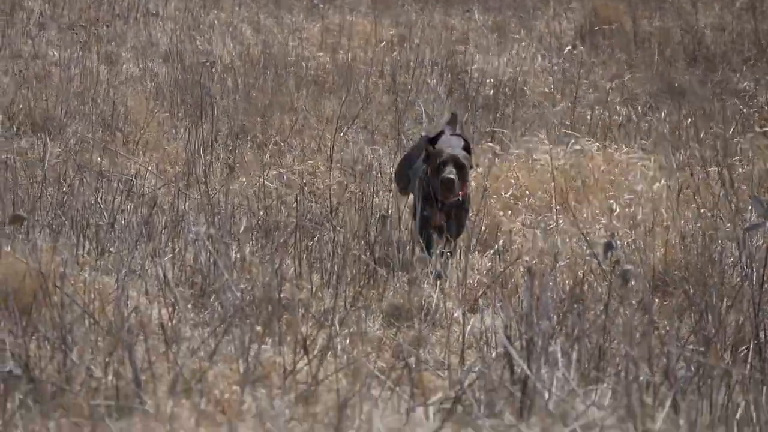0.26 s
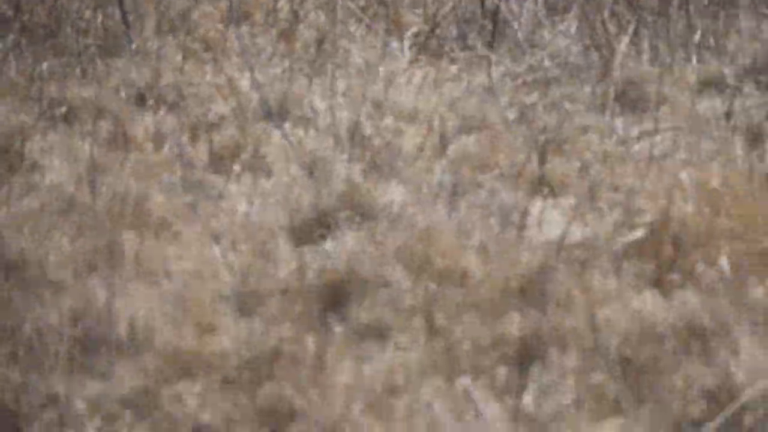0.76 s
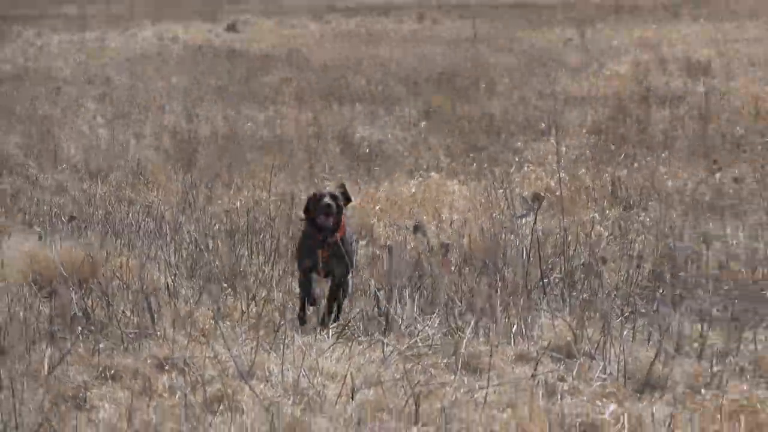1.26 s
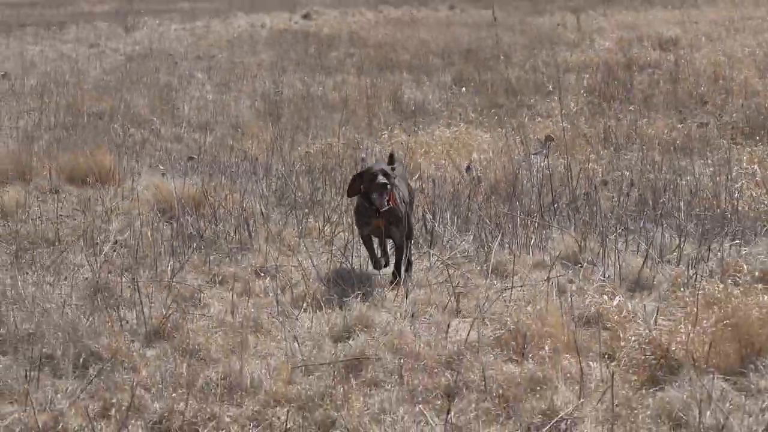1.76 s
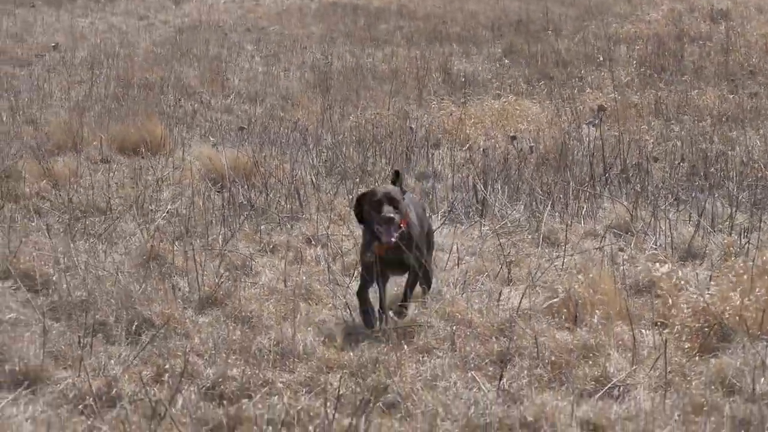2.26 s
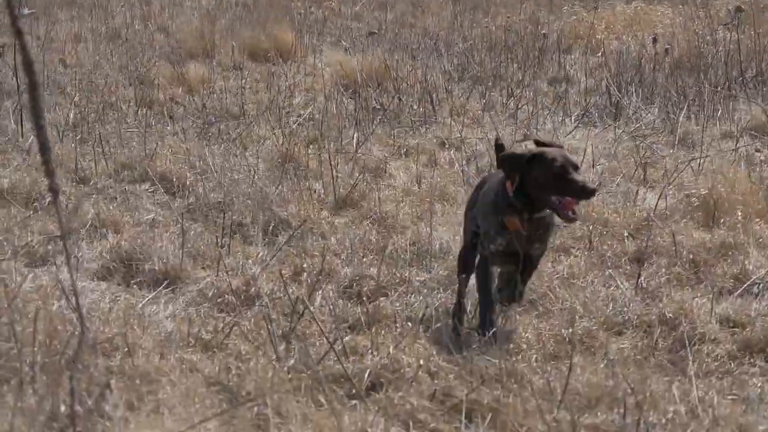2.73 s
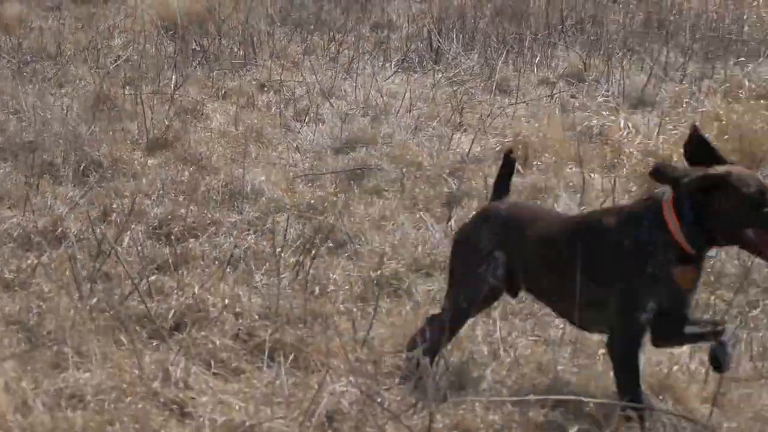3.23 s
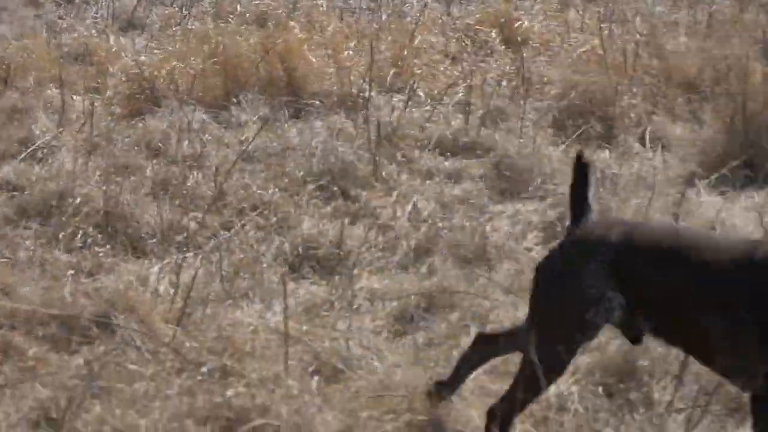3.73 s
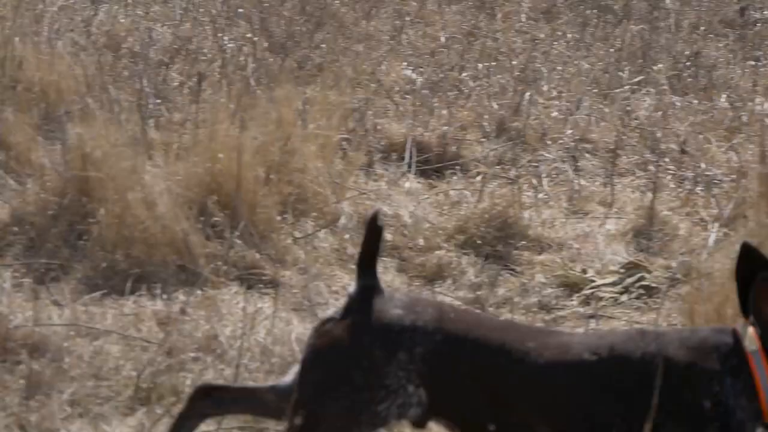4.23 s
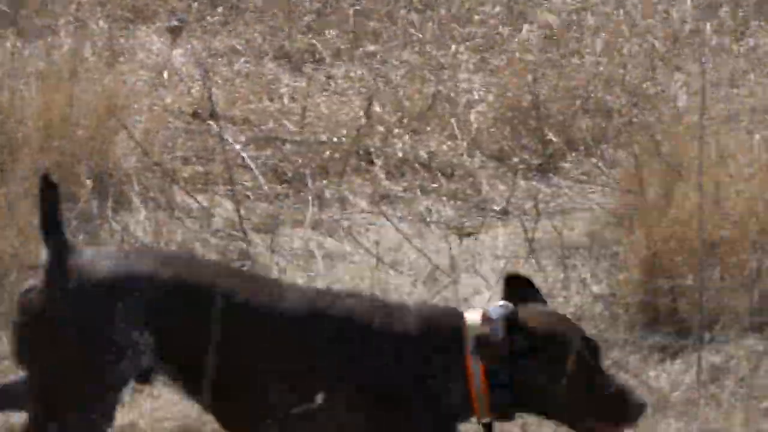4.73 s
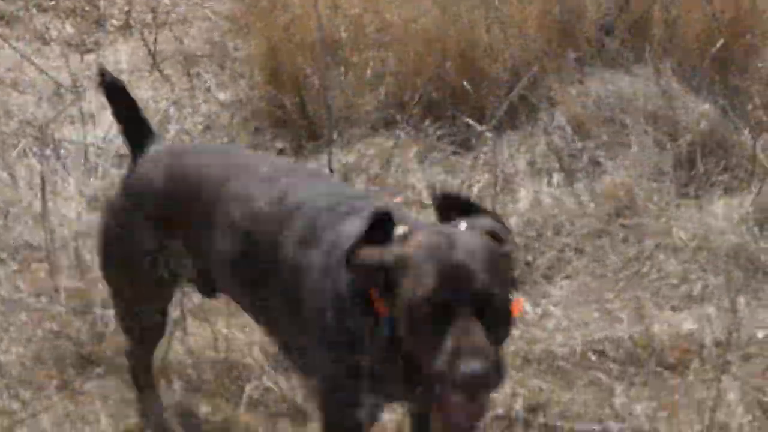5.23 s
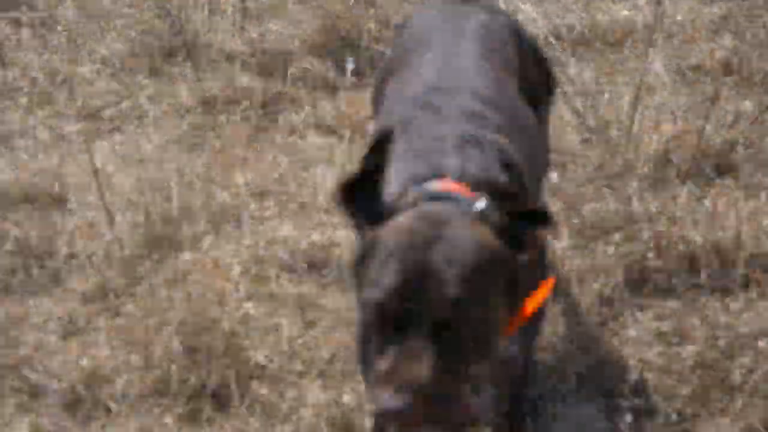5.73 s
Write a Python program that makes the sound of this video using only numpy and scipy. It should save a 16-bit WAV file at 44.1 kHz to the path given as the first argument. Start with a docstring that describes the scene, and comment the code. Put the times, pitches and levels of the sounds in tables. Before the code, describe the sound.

A small collar bell jingles in quick uneven rings as a dog gallops closer through dry grass, with strong wind rumbling over the microphone.

```python
"""Belled dog galloping through dry grass

A dog gallops towards the microphone and slows to a trot: modes of a small collar bell, struck unevenly on its
broad or narrow side, ring as decaying sines damped by the fur. Shaped noise makes the clapper's clicks,
the rustling and snapping stalks, the soft panting and the strong wind that buffets the microphone.
A faint lower sine rings from a collar fitting near the end."""
import sys
import numpy as np
from scipy.fft import rfft, irfft, next_fast_len
from scipy.io import wavfile
from scipy.ndimage import uniform_filter1d, map_coordinates

SR = 44100
rng = np.random.default_rng(int(sys.argv[2]) if len(sys.argv) > 2 else 0)


def transcribe(u):
    """Save the signal u as a 16-bit wav file named by the first command-line argument.

    u: samples, shape (n,) or (channels, n), limited to [-1, 1]; the rate is SR.
    q: integer samples, one column per channel.
    """
    v = np.clip(np.atleast_2d(u).T, -1, 1)
    q = np.round(v * 32767).astype(np.int16)
    wavfile.write(sys.argv[1], SR, q)


N = 264159
TIME = np.arange(N) / SR


def amp(db):
    """Decibels to gain."""
    return 10 ** (np.asarray(db) / 20)


def unit(x):
    """x at rms 1."""
    return x / np.sqrt(np.mean(x ** 2) + 1e-20)


def curves(rows):
    """Per-sample interpolation of each column after the time."""
    times, *columns = np.transpose(rows)
    return [np.interp(TIME, times, column) for column in columns]


def wobble(knots_per_s):
    """Smooth random curve through normally distributed knots."""
    knots = rng.standard_normal(int(N * knots_per_s / SR) + 4)
    return map_coordinates(knots, [TIME * knots_per_s])


def bump(offset, width):
    """Gaussian swell: 1 at offset 0, 1/e at one width."""
    return np.exp(-(offset / width) ** 2)


def filtered(x, response):
    """x times a gain that is a function of frequency."""
    size = next_fast_len(N + SR // 2)
    spectrum = rfft(x, size) * response(np.fft.rfftfreq(size, 1 / SR))
    return irfft(spectrum, size)[:N]


def coloured(x, points):
    """x shaped by (frequency [Hz], level [dB]) points on a log axis, at rms 1."""
    point_hz, db = np.transpose(points)
    return unit(filtered(x, lambda hz: amp(np.interp(np.log(hz + 1), np.log(point_hz + 1), db))))


def noise(points):
    """Noise of rms 1 with the given spectrum."""
    return coloured(rng.standard_normal(N), points)


def fade(age, t60):
    """Free decay of a vibration: -60 dB at age t60."""
    return np.exp(-np.log(1000) * age / t60)


def latest(times):
    """Per sample: row of the most recent event and its age [s], infinite before the first."""
    row = np.searchsorted(np.maximum.accumulate(times), TIME, side="right") - 1
    row = np.maximum(row, 0)
    age = np.where(TIME < times[row], np.inf, TIME - times[row])
    return row, age


def swinging(depth_db, drift_rad, knots_per_s):
    """Complex gain of a mode: level and phase waver as the bell swings on the collar."""
    level = amp(depth_db * np.tanh(wobble(knots_per_s)))
    return level * np.exp(1j * drift_rad * wobble(knots_per_s))


# Doppler shift of the running dog: (time [s], pitch ratio)
DOPPLER = [(0, 1.011), (1.5, 1.011), (2.7, 1.009), (3.5, 1.003), (4.1, .999), (4.8, .998), (5.3, 1),
           (6, 1.001)]


def partial(hz, envelope):
    """One bell mode: a Doppler-shifted sine under a complex envelope."""
    clock = np.cumsum(curves(DOPPLER)[0]) / SR
    smooth = np.convolve(envelope, np.ones(12) / 12, "same")  # softens steps at strikes
    return np.imag(smooth * np.exp(2j * np.pi * (hz * clock + rng.random())))


# Clapper strikes: (time [s], ring level [dB], hardness [dB/octave], side struck [-1 narrow .. 1 broad],
# hum level [dB], time until the fur has damped the hum by 60 dB [s])
STRIKES = [(0.0,-47,-9,0.13,-40,0.77), (0.107,-43.5,1,0.34,-29,0.08), (.126,-43.5,-8,-0.63,-45,.9),
           (0.193,-48.5,4,-0.087,-39,0.2), (.3,-61.5,-12,.6,-47,0.21), (0.439,-54.5,-1,0,-49,.23),
           (0.535,-44.5,-4,-0.63,-34.5,0.16), (.569,-51,-4,-.2,-27.5,0.063), (0.681,-43,-0.5,0,-50,1),
           (.95,-43,3,-0.033,-34.5,0.14), (1.017,-55,11,-.1,-40.5,0.19), (1.142,-39,1.5,-.3,-31.5,.2),
           (1.216,-50,0,-0.99,-41.5,.26), (1.386,-33.5,0.5,-0.51,-25.5,0.25),
           (1.461,-41.5,-3.5,-0.79,-31.5,0.27), (1.763,-36.5,3,-0.73,-35.5,0.17),
           (1.848,-55,0,-0.74,-35.5,0.019), (1.97,-46,-5,-0.27,-41.5,0.15), (2.158,-49,-1,-0.92,-43,0.34),
           (2.363,-48,24,0.29,-34,0.098), (2.455,-43.5,5,-0.3,-37,0.29), (2.49,-46,-5,-0.081,-41,0.47),
           (2.597,-38.5,-2.5,0.39,-28,0.29), (2.794,-41,1,-0.053,-37,0.21),
           (2.805,-44,16.5,-0.43,-45.5,0.39), (3.042,-51.5,-8,0.87,-46.5,0.22),
           (3.171,-42.5,-17,0.58,-40,0.15), (3.199,-31,6,-0.59,-33,0.065), (3.356,-51.5,-8,0.39,-39.5,.32),
           (3.46,-31.5,3.5,1,-27,0.2), (3.649,-36,7.5,0.29,-34.5,0.19), (3.778,-29,0.5,-0.87,-28,0.37),
           (3.823,-54,-2,0.03,-25,0.11), (3.946,-32,2,0.86,-29.5,.14), (4.093,-33,5,0.99,-32,0.29),
           (4.156,-24.5,5,-0.22,-22.5,0.032), (4.321,-44,-1,0.79,-48,0.26), (4.471,-34.5,7,0.32,-32,0.24),
           (4.595,-27,-3.5,-0.75,-23.5,0.78), (4.646,-33,9.5,-0.59,-29.5,0.19),
           (4.685,-32,11.5,0.42,-34,0.64), (4.812,-30,3.5,-0.54,-25.5,0.31), (5.071,-29,0.5,0.53,-30,1),
           (5.213,-28.5,-1,-0.44,-15.5,0.035), (5.222,-23.5,2.5,-0.32,-21,1),
           (5.346,-25.5,3.5,-0.2,-20,0.52), (5.586,-22.5,2,-0.56,-24.5,0.96),
           (5.715,-20,-0.5,-0.85,-18.5,0.43), (5.88,-24.5,-3.5,-0.13,-26,1)]
PIVOT_HZ = 6000


def struck_db(hz, side_db):
    """Mode level per strike: hardness tilts the spectrum about the pivot, and each mode favours a side."""
    _, ring, hardness, side, *_ = np.transpose(STRIKES)
    return ring + hardness * np.log2(hz / PIVOT_HZ) + side_db * side


# A node of the hum faces the microphone: (time [s])
NODES = [.052, 1.655, 2.735, 3.812, 4.7, 5.111, 5.19, 5.289, 5.508, 5.603, 5.769, 5.869]
HUM_HZ = 1846


def bell_hum(hum_db=0, sinking=1.51, swing_db=2, drift_rad=0.8, swing_knots_per_s=26,
             knock_db=2, knock_t60=0.094, turn_s=0.011, node_s=0.0029):
    """Lowest mode; damping grows after each strike as the bell sinks back into the fur."""
    times, *_, level, hum_s = np.transpose(STRIKES)
    row, age = latest(times)
    knock = knock_db * fade(age, knock_t60)
    hum = amp(level[row] + hum_db + knock) * fade(age ** sinking, hum_s[row] ** sinking)
    # each node: a dip and a half-cycle slip, direction alternating
    facing = np.ones(N)
    for k, s in enumerate(NODES):
        offset = TIME - s
        facing = facing * (node_s + (-1) ** k * 1j * offset) / np.hypot(offset, turn_s)
    return partial(HUM_HZ, hum * facing * swinging(swing_db, drift_rad, swing_knots_per_s))


# The bell turns the loud side of its second mode to the microphone: (time [s], swell [dB])
SWELLS = [(1.5, 11), (2.4, 24.5), (2.68, 13.5), (3.55, 10), (3.67, 12), (4.13, 6), (5.11, 11), (5.33, 15),
          (5.81, 3.5), (5.91, 8), (5.99, 5.5)]
SHIMMER_HZ = 4207


def bell_shimmer(shimmer_db=-17, side_db=5, hum_time_ratio=1.9, sinking=1.66, swell_s=0.046,
                 swing_db=4, drift_rad=1.0, swing_knots_per_s=24):
    """Second mode: fur damps it more slowly than the hum; it swells as the bell turns."""
    times, *_, hum_s = np.transpose(STRIKES)
    row, age = latest(times)
    swell = sum(db * bump(TIME - s, swell_s) for s, db in SWELLS)
    level = struck_db(SHIMMER_HZ, side_db)[row] + shimmer_db + swell
    decay = fade(age ** sinking, (hum_time_ratio * hum_s[row]) ** sinking)
    return partial(SHIMMER_HZ, amp(level) * decay * swinging(swing_db, drift_rad, swing_knots_per_s))


# Bright bell modes: (frequency [Hz])
BRIGHT_HZ = [2300, 3480, 3720, 5422, 5650, 6442, 7435, 8620, 9385, 9700, 10772, 11400, 12265, 13995, 14852]
# Same modes in order: (relative level [dB], t60 [s], gain from a strike on the broad side [dB])
BRIGHT = [(-26.5, 0.045, -14), (-16, 0.014, -10), (-12.5, 0.033, -6), (3.1, 0.21, 6.5), (0, 0.29, 3.5),
          (-8, 0.14, -18), (-14, 0.073, -6), (-2.5, .16, 5.5), (-12, .1, -3), (-16, 0.099, 9),
          (-22.5, 0.16, -4), (-18.5, 0.04, -7), (-13, 0.17, -7), (-14, 0.1, 1), (-24, 0.096, -6)]


def bell_ring(ring_db=-1, bite_db=3, bite_t60=0.039, scatter_db=4.5, twin_db=3.5,
              swing_db=2.0, drift_rad=0.6, swing_knots_per_s=35, fur_stretch=2.36):
    """Bright modes, set ringing anew by each strike and shortened by the fur."""
    strikes = np.array(STRIKES)
    count = len(strikes)
    row, age = latest(strikes[:, 0])
    bite = amp(bite_db * fade(age, bite_t60))  # brief boost at the strike
    fur = fade(age, fur_stretch * strikes[row, -1]) ** .5
    lean_db = twin_db * rng.uniform(-1.3, 1, count)  # neighbouring modes trade strength
    out = np.zeros(N)
    for k, (hz, (db, t60, side_db)) in enumerate(zip(BRIGHT_HZ, BRIGHT)):
        # finer mode pattern: more sensitive to where the clapper lands
        luck_db = scatter_db * hz / PIVOT_HZ * rng.uniform(-1.17, 1, count)
        luck_db = luck_db + (-1) ** k * lean_db
        phase = np.exp(2j * np.pi * rng.random(count))
        start = amp(struck_db(hz, side_db) + luck_db + db + ring_db) * phase
        envelope = start[row] * fade(age, t60) * bite * fur
        out += partial(hz, envelope * swinging(swing_db, drift_rad, swing_knots_per_s))
    return out


def clapper(crack_db=-16, crack_t60=0.062, clack_db=-12, clack_t60=.022, muffled_db=15, muffled_s=0.075):
    """Metal on metal: a short crack, and a lower clack boosted when the fur muffles the bell."""
    times, ring, *_, hum, hum_s = np.transpose(STRIKES)
    row, age = latest(times)
    crack = noise([(700, -44), (1600, -4), (2400, 0), (3500, 0), (8000, 32), (15000, 6)])
    clack = noise([(500, -30), (1400, -49), (2100, 26), (2800, -5), (3600, 10), (8000, -10), (15000, -24)])
    clack_level = (hum + ring) / 2 + clack_db + muffled_db * bump(hum_s, muffled_s)
    cracks = amp(ring[row] + crack_db) * fade(age, crack_t60) * crack
    clacks = amp(clack_level[row]) * fade(age, clack_t60) * clack
    return cracks + clacks


# Rustle: (time [s], relative level [dB])
GRASS = [(0.0, -55), (0.25, -57.5), (1.12, -52.5), (1.35, -52.5), (1.5, -63), (1.72, -59), (1.93, -53.5),
         (2.12, -63), (2.38, -62.5), (2.52, -56.5), (2.87, -53), (2.95, -55.5), (3.77, -47.5),
         (4.39, -49.5), (4.69, -48.5), (5.99, -46.5)]
# Stalk spectrum: (frequency [Hz], relative density [dB])
STALKS = [(400, 4), (900, 1), (2000, 1), (2800, 0), (4500, 2), (6500, 0), (8200, 4), (10200, -3.5),
          (13000, 0.5), (15500, -2)]
# Paws plunge into the grass: (time [s], extra rustle [dB])
FOOTFALLS = [(.1, 6), (.93, 2), (1.8, 5.5), (2.05, 7), (2.46, 8.5), (2.96, 5.5), (3.15, 3.5), (3.41, 1),
             (3.73, -1), (3.9, 1.5), (4.09, 7.5), (4.28, 4.5), (4.671, 9), (4.952, 4.5), (5.098, 7.5),
             (5.588, 8.5), (5.83, 7)]


def grass(rustle_db=2.0, crackle_db=-4, grains_per_s=500, surge_db=2.0, footfall_s=0.046):
    """Legs brush stalks: noise swish plus sparse random crackle, its level shifted at footfalls."""
    strides = sum(db * bump(TIME - s, footfall_s) for s, db in FOOTFALLS)
    rustle = amp(curves(GRASS)[0] + rustle_db + strides + surge_db * wobble(35))
    grains = rng.laplace(size=N) * (rng.random(N) < grains_per_s / SR)
    return rustle * (noise(STALKS) + amp(crackle_db) * coloured(grains, STALKS))


# Spectra of buffets, eddies and field hush: (frequency [Hz], relative density [dB])
BUFFET = [(4, -56), (9, -11), (13, 2), (22, 0.5), (34, -4.5), (50, -13), (70, -21), (100, -39), (200, -100)]
FLUTTER = [(45, -5.5), (70, 2), (100, -3), (160, -9.5), (250, -19.5), (400, -28.5), (700, -39),
           (1500, -42.5), (4000, -66.5)]
AIR = [(100, 9.5), (500, 11), (1000, 7), (2000, -0.5), (4000, -2), (9000, -26), (15000, -87)]
# Steady push of the wind: (time [s], relative level [dB])
BUFFET_LEVEL = [(0.0, -40), (0.28, -25), (0.42, -20.5), (0.7, -29.5), (1.55, -16.5), (1.75, -22.5),
                (2.03, -19), (3.89, -25.5), (4.09, -18.5), (5.24, -31.5), (5.76, -27), (5.99, -32.5)]
# Fast eddies: (time [s], relative level [dB])
FLUTTER_LEVEL = [(0.0, -30.5), (0.8, -37.5), (1.15, -33), (1.3, -25), (1.35, -25), (1.38, -20.5),
                 (1.47, -30), (1.77, -30.5), (1.88, -24), (2.08, -33), (2.12, -24.5), (2.25, -29.5),
                 (2.27, -32.5), (2.57, -26.5), (2.67, -31), (2.77, -27.5), (2.92, -41), (2.95, -27.5),
                 (3.72, -35), (3.97, -29.5), (4.61, -28.5), (4.9, -36.5), (5.09, -35.5), (5.36, -44),
                 (5.44, -29), (5.47, -34), (5.99, -42)]
# Single gusts: (centre time [s], half-width to 1/e [s], relative level [dB])
GUSTS = [(0.097, 0.21, -15.5), (1.42, 0.071, -12), (1.668, 0.034, -16.5), (1.918, 0.021, -7),
         (2.122, 0.085, -10), (2.736, 0.084, -13), (3.113, 0.1, -15), (3.602, 0.053, -12.5),
         (4.405, 0.071, -13.5), (4.735, 0.028, -7), (5.191, .06, -10.5)]


def wind(buffet_db=4, gust_db=1, flutter_db=-1, lump_db=2.5, air_db=-57):
    """Gusts push the microphone in slow buffets and faster eddies, over the hush of the field."""
    gusts = sum(amp(db + gust_db) * bump(TIME - s, width) for s, width, db in GUSTS)
    force = np.hypot(amp(curves(BUFFET_LEVEL)[0] + buffet_db), gusts)
    push = noise(BUFFET)
    # even out the buffets so that force sets the level
    push /= np.sqrt(np.abs(uniform_filter1d(push ** 2, size=4000)) + .2)
    eddies = unit(noise(FLUTTER) * amp(lump_db * wobble(30)))
    flutter = amp(curves(FLUTTER_LEVEL)[0] + flutter_db) * eddies
    hush = amp(air_db + wobble(3.73)) * noise(AIR)
    return force * push + flutter + hush


# Dry stalks snap: (time [s], relative level [dB])
SNAPS = [(0.901, -35), (2.332, -38), (2.533, -38), (2.8453, -32), (3.3323, -43), (3.356, -27),
         (3.5818, -17), (3.704, -29), (4.076, -18), (4.254, -23), (4.4346, -26.5), (4.552, -22.5),
         (4.6555, -21), (5.053, -20)]


def snaps(snap_db=-6, t60=0.026):
    """A breaking stalk: a brief, bright burst of decaying noise."""
    times, db = np.transpose(SNAPS)
    row, age = latest(times)
    crack = noise([(600, -45), (2000, -12), (5000, 12.5), (9000, 5.0), (15000, 5.5)])
    return amp(db[row] + snap_db) * fade(age, t60) * crack


# Pants: (centre time [s], half-width to 1/e^2 [s], level [dB])
PANTS = [(2.045, 0.054, -48.5), (2.413, 0.046, -50.5), (2.702, 0.042, -52.5), (2.926, 0.041, -54),
         (3.281, 0.059, -47.5), (3.562, 0.037, -44), (3.817, 0.04, -45), (4.191, 0.029, -42.5),
         (4.401, 0.042, -37.5), (4.712, 0.0076, -41), (5.139, 0.01, -42.5)]


def panting(pant_db=0, mouth_hz=1060, sharpness=4, spread=1.162):
    """Puffs of air noise through two resonances of the dog's open mouth."""
    def mouth(hz):
        """Sum of two resonance curves, one below and one above mouth_hz."""
        gain = 0
        for centre in (mouth_hz / spread, mouth_hz * spread):
            detuning = hz / centre - centre / np.maximum(hz, 1)
            gain = gain + 1 / (1 + (sharpness * detuning) ** 2)
        return gain

    puffs = sum(amp(db + pant_db) * np.exp(-2 * ((TIME - s) / width) ** 2) for s, width, db in PANTS)
    return puffs * unit(filtered(rng.standard_normal(N), mouth))


# A collar fitting rings: (time [s], level [dB])
TAG = [(5.213, -45), (5.3, -36), (5.716, -48)]


def tag(hz=1378, t60=0.56):
    """Faint lower collar ring: a decaying sine with softened onsets, heard when the dog is close."""
    times, db = np.transpose(TAG)
    row, age = latest(times)
    envelope = uniform_filter1d(amp(db[row]) * fade(age, t60), size=400)
    return envelope * np.sin(2 * np.pi * hz * TIME)


def scene():
    """The dog in an open, windy field, without echoes."""
    bell = bell_hum() + bell_shimmer() + bell_ring() + clapper()
    return (bell + grass() + wind() + snaps() + panting() + tag())[None]


TOP_HZ = 15650


def record(dry):
    """Steep low-pass, -3 dB at TOP_HZ."""
    return filtered(dry[0], lambda hz: 1 / np.sqrt(1 + (hz / TOP_HZ) ** 160))[None]


dry = scene()
out = record(dry)
transcribe(out)
```